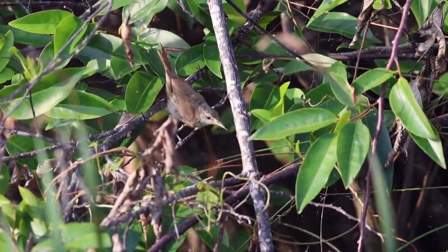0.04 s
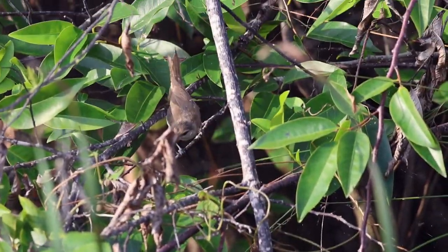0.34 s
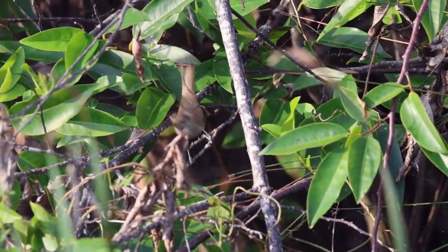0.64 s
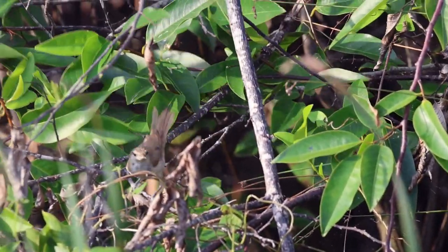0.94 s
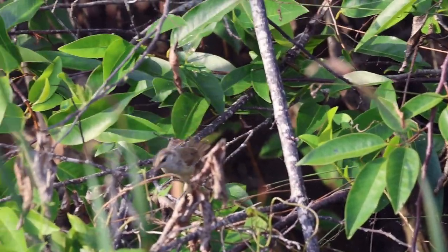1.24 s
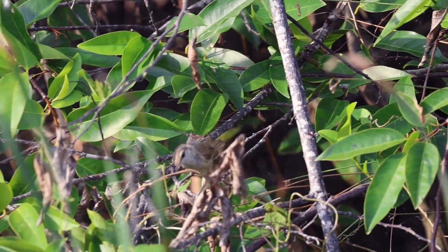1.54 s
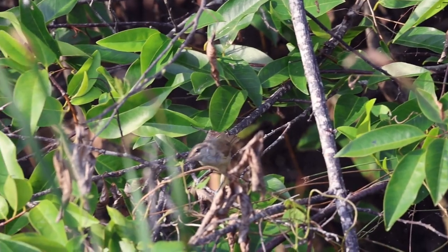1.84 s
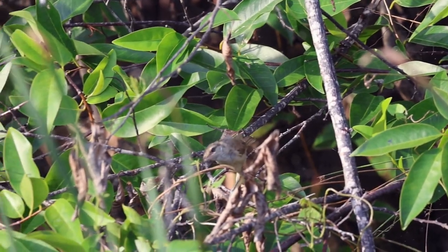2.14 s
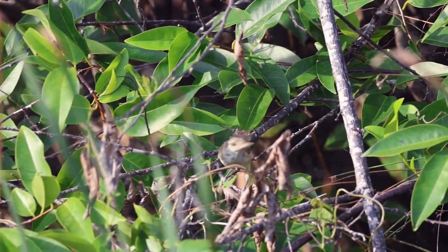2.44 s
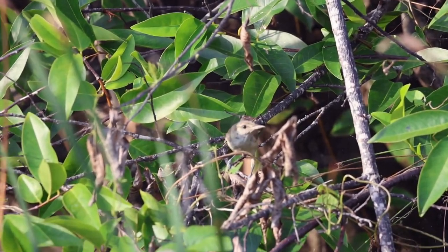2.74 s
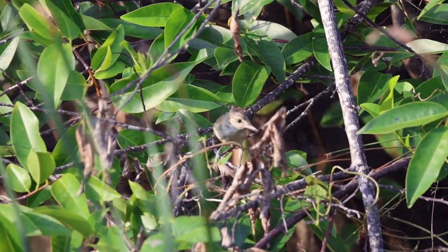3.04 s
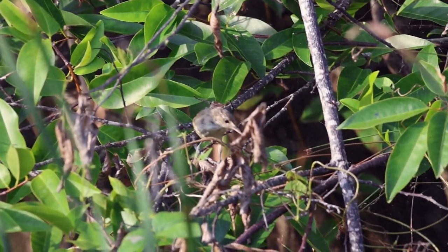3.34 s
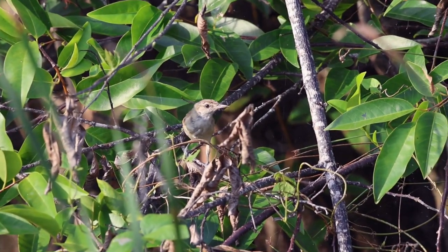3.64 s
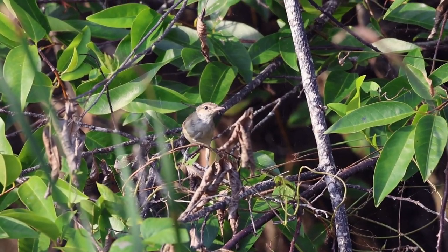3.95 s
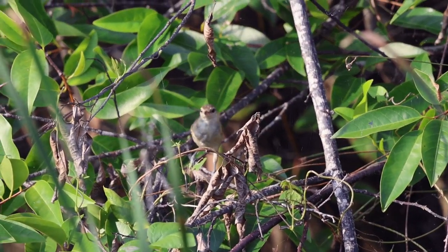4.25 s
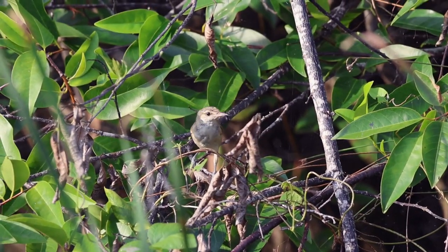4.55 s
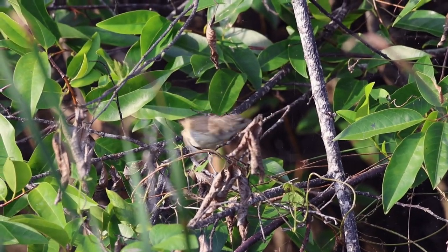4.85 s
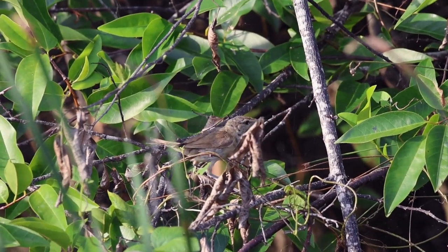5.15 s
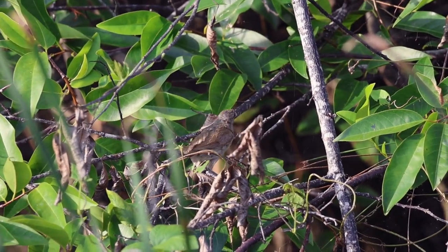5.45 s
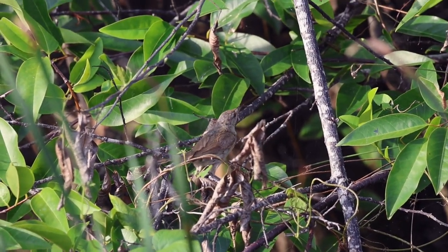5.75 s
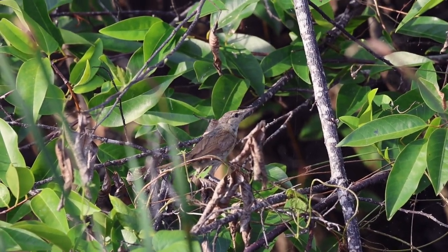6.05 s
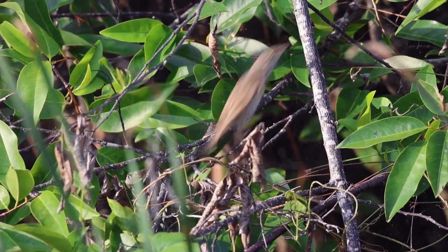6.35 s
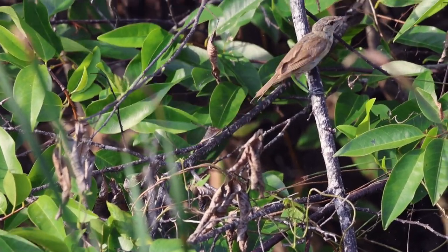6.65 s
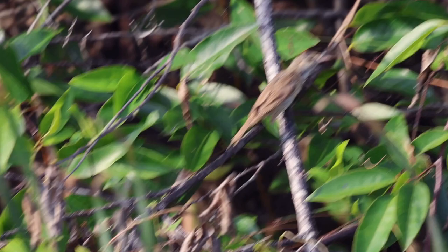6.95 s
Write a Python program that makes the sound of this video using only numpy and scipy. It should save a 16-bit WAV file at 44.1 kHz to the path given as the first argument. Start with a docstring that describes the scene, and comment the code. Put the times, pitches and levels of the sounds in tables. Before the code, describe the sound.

Small birds warble and whistle in quick, repeated phrases deep in a leafy thicket, while a harsher one scolds and rasps slightly to the left. Faint far whistles, hoots and yelps join in. Just past halfway, a small bird near the microphone chips and sings three loud, sweeping phrases, then the quieter calls resume. Soft hiss, shrill insects and a distant engine drone run underneath.

```python
"""A waterside thicket: soft hiss, a distant engine's drone, shrill insects and a harsh bird's steady chatter
run throughout. Birds deep in the leaves warble and whistle first, while the harsh one scolds and rasps on the
left. Drawn-out far whistles enter near 2 s, hoots and yelps near 3 s. At about 4 s a small warbler close by
chips and sings three loud, sweeping phrases, its syrinx tone scattered by the leaves. The calls come round in
the same order every 4.8 s."""
import sys
import numpy as np
from scipy import signal
from scipy.fft import rfft, irfft, next_fast_len
from scipy.io import wavfile
from scipy.ndimage import uniform_filter1d, map_coordinates

SR = 44100
rng = np.random.default_rng(int(sys.argv[2]) if len(sys.argv) > 2 else 0)


def put_to_file(sound):
    """Save the sound as 16-bit audio at rate SR, in the file named by the first command-line argument."""
    columns = np.atleast_2d(sound).T  # one column per channel
    safe = np.clip(columns, -1, 1)
    whole_steps = np.round(safe * 32767)
    wavfile.write(sys.argv[1], SR, whole_steps.astype(np.int16))


N = 313551

# Tone colours of the noise beds and the scolder's throat. Each row: frequency in Hz, level in dB.
AIR_COLOUR = [(200, -16.5), (330, -0.5), (500, -7.5), (900, -8.5), (1400, -12), (2200, -14), (5000, -15.5),
              (8000, -18.5), (11000, -30.5), (15000, -27.5)]
ENGINE_COLOUR = [(15, -58), (25, -46), (54, 4), (87, -1), (124, 1), (151, 0.5), (257, -15), (321, -15.5),
                 (400, -22.5), (520, -29.5), (880, -120)]
INSECT_COLOUR = [(7500, -37), (8600, -19), (9200, -4.5), (9600, -1.5), (10050, -4.5), (10400, -22),
                 (11000, -38)]
CHORUS_COLOUR = [(2000, -50), (2700, -13), (3300, -4), (4200, 0), (4950, 4.5), (5600, -15), (6600, -12),
                 (7500, -32), (9000, -58)]
THROAT_COLOUR = [(1200, -6), (2200, -6), (3000, 1), (5800, 2), (7500, -3), (11000, -1.5), (15000, -8.5)]
# The engine's hum. Each row: pitch in Hz, level in dB.
ENGINE_TONES = [(58, -62), (114, -56.5), (140.5, -60)]
# Stereo image of the beds. Each row: frequency in Hz, left-right likeness from -1 to 1.
BED_LIKENESS = [(60, 0.97), (150, 0.94), (300, 0.56), (700, 0.49), (1500, 0.12), (4000, -0.41),
                (10000, 0.0016)]
# Fader ride of the scolder's chatter over one round. Each row: time in seconds, level in dB.
CHORUS_RIDE = [(0.0, -48.5), (0.46, -49), (0.96, -47.5), (1.41, -52), (2.78, -54.5), (3.35, -52),
               (3.83, -61.5), (4.22, -47.5), (4.77, -45.5)]
# Ring of the thicket. Each row: frequency in Hz, seconds to fall by 60 dB.
THICKET_DECAY = [(2000, 0.23), (4500, 0.26), (6600, 0.43), (12000, 0.17)]
# Foliage shading the near warbler. Each row: frequency in Hz, left minus right in dB.
FOLIAGE_PAN = [(3100, -3.5), (3800, -3), (4300, 2), (4500, -2), (4900, 0), (5600, -3), (6500, -6.5),
               (9000, -2)]

# Call shapes, one syllable to a row. Each row: onset in seconds, length in seconds, start, middle and
# end pitch in Hz, level within the call in dB, place of the crest from 0 to 1.
HOOT_SHAPE = [(0.0066, 0.052, 1100, 1240, 960, 0, 0.56)]
FAR_WHISTLE_SHAPE = [(0, .2, 1610, 1585, 1450, 0, .55)]
WARBLE_SHAPE = [(0, 0.029, 4070, 4100, 4050, 4.6, .55), (.027, 0.021, 4700, 5960, 7600, 2.2, 0.36),
                (.044, .036, 7150, 6570, 5100, 7.7, 0.75), (.089, 0.011, 3620, 3725, 3800, 1, 0.34),
                (.099, .026, 4490, 3780, 3420, 4, .35), (.13, .029, 4390, 4500, 5200, 5.8, 0.78),
                (.156, 0.016, 5400, 5500, 5650, 11, 0.35)]
UPSLUR_SHAPE = [(0, 0.015, 3166, 3535, 3770, -7.5, 0.49), (.028, 0.0194, 4354, 4225, 3790, -0.5, 0.67),
                (.047, .042, 4500, 5760, 6250, 5.5, 0.34)]
LONG_WHISTLE_SHAPE = [(0, .027, 6350, 7050, 7750, -2, 0.67), (.025, .042, 7700, 7370, 7200, 3.5, 1),
                      (.063, .095, 7350, 6100, 5100, 6, .35)]
DOWNSLUR_SHAPE = [(0, 0.026, 5200, 5250, 5340, -5.5, .7), (.028, .049, 7200, 5950, 4630, -5.5, 0.48),
                  (.09, .05, 4150, 3970, 3860, -13, .4)]
SCOLD_SHAPE = [(0.00085, .064, 5700, 4550, 4050, 4.4, 0.14)]
YELP_SHAPE = [(0.0031, .05, 2100, 2900, 2700, 0, 0.52)]
CHIP_SHAPE = [(0, 0.011, 3290, 4980, 6240, -2, 0.55), (.007, 0.013, 5820, 5110, 3600, -1.4, 0.16)]
SONG_SHAPE = [(0, .005, 5800, 4500, 3500, -12.5, .5), (.006, .035, 3460, 3230, 2880, -11.5, .7),
              (.042, .015, 3870, 3830, 3800, -9.5, .7), (.059, .025, 4620, 4830, 4880, -4.5, .5),
              (.080, .019, 4830, 4540, 4260, 2.5, .48), (.101, .021, 4900, 5850, 6500, -.5, .55),
              (.119, .016, 6480, 6570, 6580, 1.5, .6), (.135, .007, 6900, 7800, 6900, -13, .5),
              (.141, .028, 6350, 4000, 3500, -.7, .38), (.168, .031, 4470, 4280, 4350, -.7, .55)]

# Call cues for one round. Each row: start in seconds, level in dB, pitch ratio, length ratio.
HOOT_CUES = [(2.902, -49.5, 0.97, 1), (3.159, -49.5, 0.99, 0.98), (3.698, -52, 1.67, 0.48),
             (3.718, -54, 0.93, 0.77), (3.764, -54, 1.3, .5), (3.808, -52, 1.5, 0.44),
             (3.815, -51.5, .8, .6), (3.934, -53.5, 1.03, 0.48)]
FAR_WHISTLE_CUES = [(1.872, -59, 1, 1.12), (2.259, -58.5, 0.96, 0.97), (2.691, -59, 1.03, 1.1)]
LONG_WHISTLE_CUES = [(.575, -61, 1.02, 1.1), (1.531, -46, 1.006, 1.02), (2.414, -60.5, 1.05, 1.2),
                     (3.168, -46, 1.02, 1.02), (3.695, -50, 1.06, 0.9)]
DOWNSLUR_CUES = [(3.566, -36.5, 0.97, 0.93), (3.882, -38, 0.98, 1)]
SCOLD_CUES = [(.272, -42, 0.94, 1.07), (1.307, -40, 1.015, 1.02), (2.126, -40, 0.96, 1.05),
              (2.86, -39.5, 0.96, 0.92), (3.33, -40.5, 1.03, .8), (3.787, -40, 0.96, 1.3)]
YELP_CUES = [(2.825, -52, 0.98, 1), (2.893, -50, 0.87, 1), (2.95, -50.5, 0.95, 0.88),
             (2.994, -55, 1.1, 0.52), (3.213, -43.5, 1.1, 0.9), (3.246, -43, 1.07, 0.84),
             (3.284, -45, .92, 1), (3.337, -46.5, .93, .9)]
CHIP_CUES = [(3.853, -22, 1, 1)]
SONG_CUES = [(4.0238, -17.2, 1.003, .977), (4.3278, -16.8, 1.022, .977), (4.63, -14.7, 1, 1)]

# Thin insect buzzes and toneless bird rasps.
# Each row: start in seconds, length in seconds, level in dB, centre in Hz.
BUZZ_CUES = [(2.06, 0.16, -60.5, 8100), (2.3, 0.2, -59, 7600), (4.02, 0.14, -58, 8100)]
RASP_CUES = [(.655, .096, -42, 4550), (.99, .08, -46, 4200), (2.89, .18, -53, 4160), (3.21, .18, -46, 4600),
             (3.452, .1, -43.5, 4240), (3.81, .07, -44, 5070)]

ROUND_S = 4.7714
NEAR_LEAVES_DB, DEEP_LEAVES_DB = -11, -4  # early echo sends
NEAR_TAIL_DB, DEEP_TAIL_DB = -14.5, -11  # reverb sends


def amp(db):
    """Decibels to gain."""
    return 10 ** (np.asarray(db) / 20)


def unit(x):
    """Scale to rms 1."""
    return x / np.sqrt(np.mean(x ** 2) + 1e-20)


def along(points, hz):
    """Read a curve of (Hz, value) points on a log frequency axis."""
    knots_hz, values = np.transpose(points)
    return np.interp(np.log(hz + 1), np.log(knots_hz + 1), values)


def wobble(rate, size=N):
    """A smooth random curve, rate knots a second."""
    knots = rng.standard_normal(int(size * rate / SR) + 4)
    return map_coordinates(knots, [np.arange(size) * rate / SR])


def filtered(x, response):
    """Pass x through a complex frequency response."""
    size = x.shape[-1]
    padded = next_fast_len(size + SR // 10)
    return irfft(rfft(x, padded) * response(np.fft.rfftfreq(padded, 1 / SR)), padded)[..., :size]


def pan(pair, db):
    """Make the left side louder than the right by db."""
    return pair * amp(db * np.array([[.5], [-.5]]))


def add(track, start_s, sound):
    """Mix a sound into the track, trimming any overhang."""
    start = round(start_s * SR)
    sound = sound[max(-start, 0):max(N - start, 0)]
    track[max(start, 0):][:len(sound)] += sound


def recurring(cues):
    """Loop the cues every ROUND_S seconds."""
    return [(start_s + turn * ROUND_S, *rest) for turn in (-1, 0, 1) for start_s, *rest in cues]


def bout(start_s, beat_s, db, count, slowing_s=0):
    """Cues for like calls on a beat; each gap is slowing_s longer than the last."""
    return [(start_s + k * beat_s + slowing_s * k * (k - 1) / 2, db, 1, 1) for k in range(count)]


def noise_bed(colour, patchy_db):
    """Coloured stereo noise of rms 1 that flickers in patches of time and pitch."""
    spectra = signal.stft(rng.standard_normal((2, N)), nperseg=512)[2]
    patches = uniform_filter1d(rng.standard_normal(spectra.shape[1:]), size=5, axis=0)
    patches = uniform_filter1d(patches, size=10, axis=1)
    pair = signal.istft(spectra * amp(patchy_db * unit(patches)), nperseg=512)[1][:, :N]
    width = lambda hz: np.arccos(np.clip(along(BED_LIKENESS, hz), -1, 1)) / 2
    mid, side = filtered(pair, lambda hz: amp(along(colour, hz)) * [np.cos(width(hz)), np.sin(width(hz))])
    return unit(np.array([mid + side, mid - side]))


def syllable(length_s, pitches, crest, edge_s=.0025, sag_db=11):
    """Pitch glides in one arc through start, middle and end; effort swells to a crest and sags."""
    progress = np.linspace(0, 1, max(int(length_s * SR), 2))
    arc = np.polyval(np.polyfit([0, .5, 1], pitches, 2), progress)
    fade = np.clip(np.minimum(progress, 1 - progress) * length_s / edge_s, 0, 1)
    return arc, np.sin(np.pi / 2 * fade) * amp(-sag_db * np.abs(progress - crest))


def whistles(shape, cues, waver, overtone_db=-46, rough=0., clean_s=.00976, flutter_db=1.5):
    """A syrinx tone sings the shape on each cue; a rough one breaks into chaos after a clean start."""
    track = np.zeros(N)
    for start_s, db, pitch, stretch in recurring(cues):
        for onset_s, length_s, *pitches, syllable_db, crest in shape:
            arc, swell = syllable(length_s * stretch, pitches, crest)
            size = len(arc)
            chaos = rough * np.clip(np.arange(size) / SR / clean_s - 1, 0, 1)
            bend = .005 * wobble(70, size)
            unsteady = 1 + bend + waver * wobble(409.5, size) + .151 * chaos * wobble(1800, size)
            phase = 2 * np.pi * np.cumsum(arc * pitch * unsteady) / SR
            tone = np.sin(phase) + amp(overtone_db) * np.sin(2 * phase)
            flutter = flutter_db * wobble(107, size) + 2 * chaos * wobble(700, size)
            effort = amp(db + syllable_db + flutter) * swell
            hiss = .16 * rough * rng.standard_normal(size)
            add(track, start_s + onset_s * stretch, effort * (tone + hiss))
    return track


def rasps(cues, width_hz, pulse_hz, rough_db):
    """Uneven bursts of noise through one broad resonance."""
    track = np.zeros(N)
    for start_s, length_s, db, centre_hz in recurring(cues):
        size = int(length_s * SR)
        bursts = rng.standard_normal(size) * amp(rough_db * wobble(pulse_hz, size))
        note = filtered(bursts, lambda hz: 1 / (1 + ((hz - centre_hz) / width_hz) ** 2) ** 2)
        add(track, start_s, amp(db) * unit(note) * signal.windows.tukey(size, .6))
    return track


def thicket(x, lag_ms, leaves_db=DEEP_LEAVES_DB, tail_db=DEEP_TAIL_DB, leaf_decay_s=.004):
    """The left side hears the sound lag_ms after the right; leaves echo it and the thicket rings on."""
    direct = filtered(x, lambda hz: np.exp(1j * np.pi * hz * lag_ms / 1000 * np.array([[-1], [1]])))
    hz, t, spectra = signal.stft(rng.standard_normal((2, SR)), SR, nperseg=256)
    decay = amp(-60 * t / along(THICKET_DECAY, hz)[:, None])
    tail = signal.istft(spectra * decay, SR, nperseg=256)[1]
    age = np.arange(tail.shape[1]) / SR
    leaves = rng.standard_normal(tail.shape) * (age > .001) * np.exp(-age / leaf_decay_s)
    echoes = amp(leaves_db) * leaves / np.linalg.norm(leaves[0])
    echoes += amp(tail_db) * tail / np.linalg.norm(tail[0])
    return direct + signal.fftconvolve(x[None], echoes, axes=1)[:, :N]


def air():
    """The soft hiss of air in the reeds."""
    return amp(-57) * noise_bed(AIR_COLOUR, patchy_db=1.77)


def engine():
    """A distant engine: wavering hum tones in a low drone."""
    t = np.arange(N) / SR
    hum = sum(amp(db + 4.7 * wobble(5.8)) * np.sin(2 * np.pi * hz * t + 1.8 * wobble(12))
              for hz, db in ENGINE_TONES)
    return hum + amp(-47.5) * noise_bed(ENGINE_COLOUR, patchy_db=1.73)


def insects(stroke_hz=70.5, level_db=-54.5, swell_db=1.2):
    """A shrill band pulsing with wing strokes, and a few short buzzes."""
    strokes = np.sin(2 * np.pi * np.cumsum(stroke_hz + 2 * wobble(10)) / SR)
    shrill = unit(noise_bed(INSECT_COLOUR, patchy_db=1.5) * (1 + .17 * strokes))
    shrill *= amp(level_db + swell_db * wobble(3.53))
    buzzes = rasps(BUZZ_CUES, width_hz=1050, pulse_hz=304, rough_db=-1.5)
    return shrill + thicket(buzzes, lag_ms=0, tail_db=-12)


def twitter(count, centre_hz, spread, scatter_db):
    """Tiny ticks at chance moments, most falling in pitch; rms 1."""
    track = np.zeros(N)
    t = np.arange(int(.008 * SR)) / SR
    starts = rng.uniform(0, N / SR, count)
    for start_s, (pitch, glide, strength) in zip(starts, rng.standard_normal((count, 3))):
        hz = centre_hz * np.exp(spread * pitch + 25 * (glide - 1) * (t - t.mean()))
        tick = np.hanning(len(t)) * np.sin(2 * np.pi * np.cumsum(hz) / SR)
        add(track, start_s, amp(scatter_db * np.tanh(strength)) * tick)
    return unit(track)


def chorus(wash_over_ticks_db=7, trim_db=3):
    """The harsh bird's ceaseless chatter blurs into a wash with faint ticking, off to the left like its calls."""
    ticks = thicket(twitter(count=600, centre_hz=4434, spread=.1095, scatter_db=1.5), lag_ms=-.11)
    wash = amp(wash_over_ticks_db) * noise_bed(CHORUS_COLOUR, patchy_db=4.5)
    ride_db = np.interp(np.arange(N) / SR % ROUND_S, *np.transpose(CHORUS_RIDE))
    return pan(amp(ride_db + trim_db) * unit(unit(ticks) + wash), db=2)


def far_birds():
    """Soft, husky hoots, and drawn-out whistles wet with echo."""
    hoots = whistles(HOOT_SHAPE, HOOT_CUES, waver=.02, overtone_db=-20, rough=.15)
    hoots = thicket(hoots, lag_ms=-.076, leaves_db=NEAR_LEAVES_DB)
    drawn_out = whistles(FAR_WHISTLE_SHAPE, FAR_WHISTLE_CUES, waver=.023, flutter_db=2.5)
    return pan(hoots, db=4) + thicket(drawn_out, lag_ms=-.066, leaves_db=NEAR_LEAVES_DB, tail_db=-3)


def neighbours():
    """Whistling birds straight ahead, deep in the thicket."""
    warbles = bout(start_s=.059, beat_s=.294, db=-41.5, count=4, slowing_s=.004)
    upslurs = bout(start_s=.863, beat_s=.2765, db=-44, count=5)
    song = whistles(WARBLE_SHAPE, warbles, waver=.013, flutter_db=2.5)
    song += whistles(UPSLUR_SHAPE, upslurs, waver=.019)
    song += whistles(LONG_WHISTLE_SHAPE, LONG_WHISTLE_CUES, waver=.0072, rough=.34, clean_s=.03)
    song += whistles(DOWNSLUR_SHAPE, DOWNSLUR_CUES, waver=.01)
    return pan(thicket(song, lag_ms=-.045), db=1)


def scolder():
    """A harsh bird off to the left scolds, yelps and rasps, all coloured by its throat."""
    calls = whistles(SCOLD_SHAPE, SCOLD_CUES, waver=.022, overtone_db=-25, rough=.824, clean_s=.007)
    calls += whistles(YELP_SHAPE, YELP_CUES, waver=.036, overtone_db=-23, rough=.59)
    calls += rasps(RASP_CUES, width_hz=1490, pulse_hz=261, rough_db=-2.5)
    voice = filtered(calls, lambda hz: amp(along(THROAT_COLOUR, hz)))
    return pan(thicket(voice, lag_ms=-.11, tail_db=-12), db=3)


def warbler():
    """The lead: a gritty chip and an almost pure song; foliage shades each side differently by pitch."""
    song = whistles(SONG_SHAPE, SONG_CUES, waver=.004, overtone_db=-38, rough=.054, flutter_db=.86)
    chip = whistles(CHIP_SHAPE, CHIP_CUES, waver=.041, overtone_db=-26, rough=.49, clean_s=.002)
    voice = thicket(song + chip, lag_ms=.036, leaves_db=NEAR_LEAVES_DB, tail_db=NEAR_TAIL_DB)
    return .89 * filtered(voice, lambda hz: pan(1, along(FOLIAGE_PAN, hz)))


def scene():
    """The stereo mix: the warbler in front, the other birds behind, the beds underneath."""
    return warbler() + neighbours() + scolder() + far_birds() + chorus() + insects() + air() + engine()


def record(dry, top_hz=15730):
    """A brick-wall low-pass trims the very top of the mix."""
    return filtered(dry, lambda hz: hz < top_hz)


dry = scene()
out = record(dry)
put_to_file(out)
```